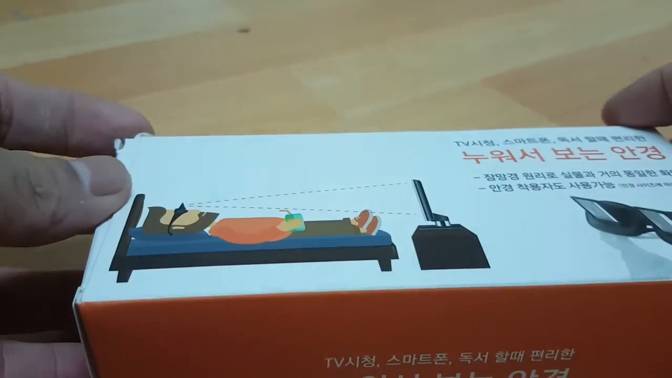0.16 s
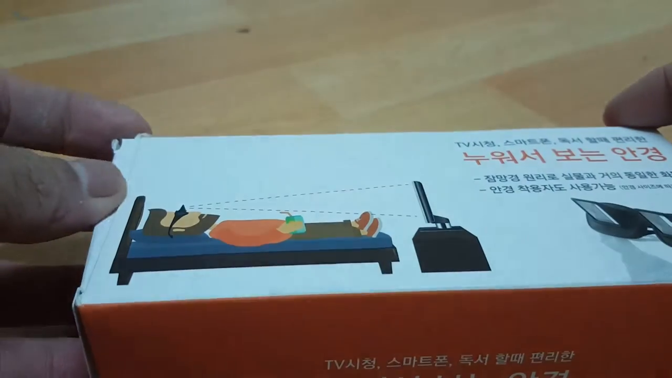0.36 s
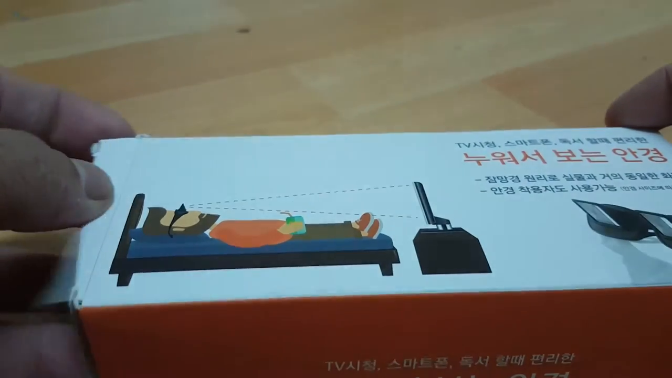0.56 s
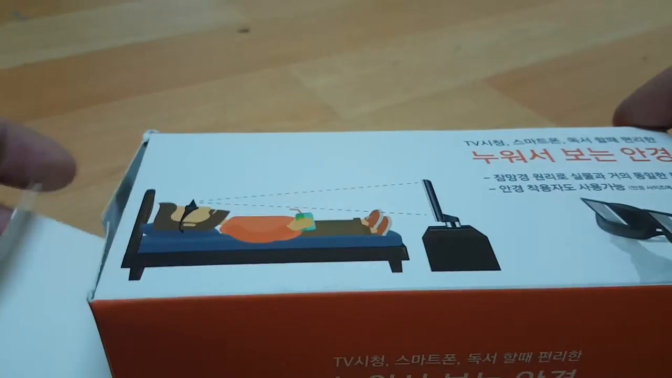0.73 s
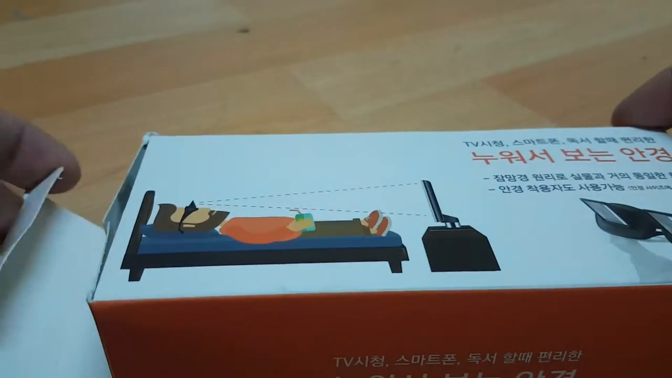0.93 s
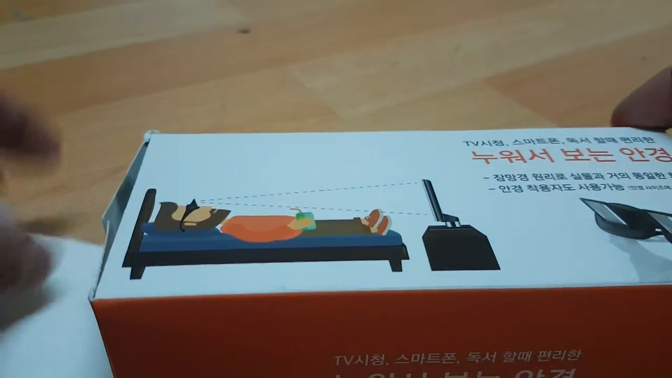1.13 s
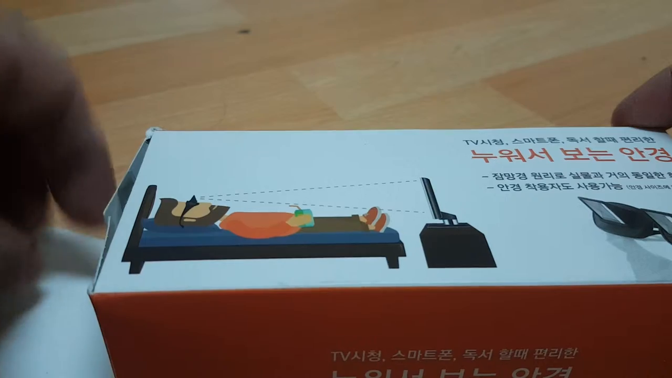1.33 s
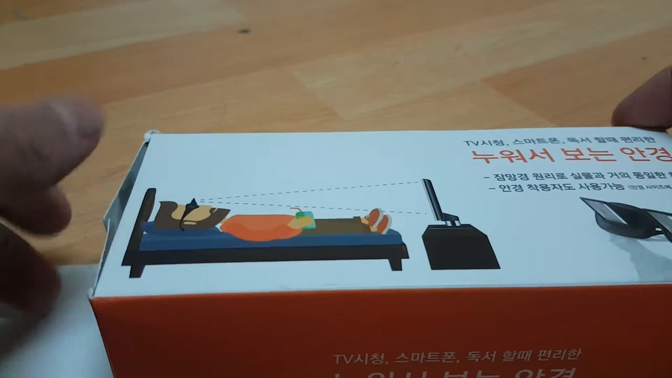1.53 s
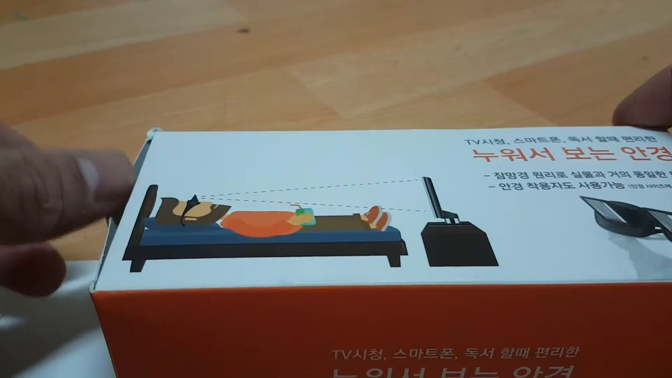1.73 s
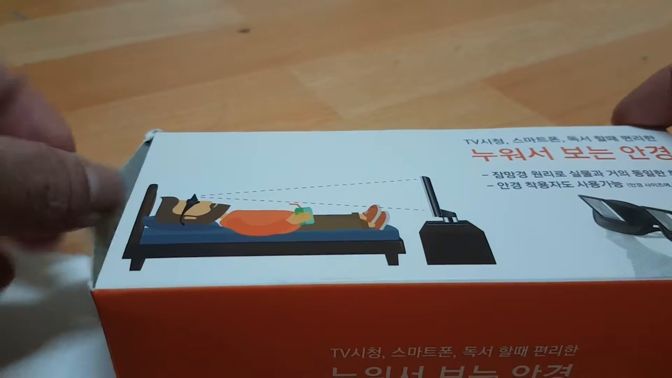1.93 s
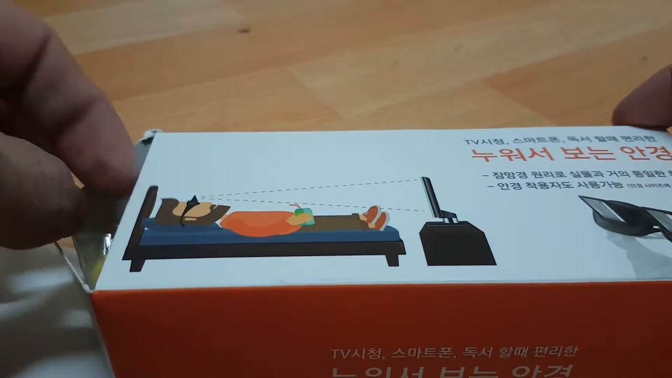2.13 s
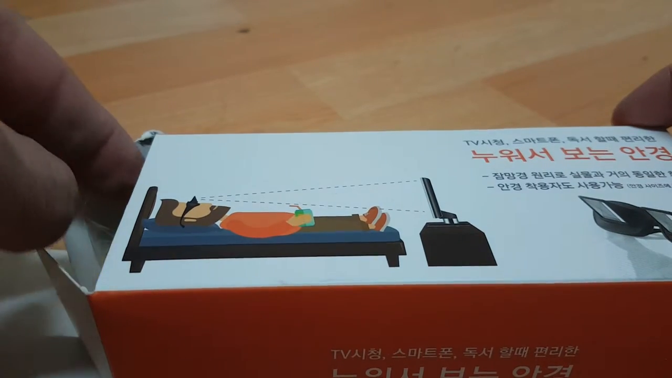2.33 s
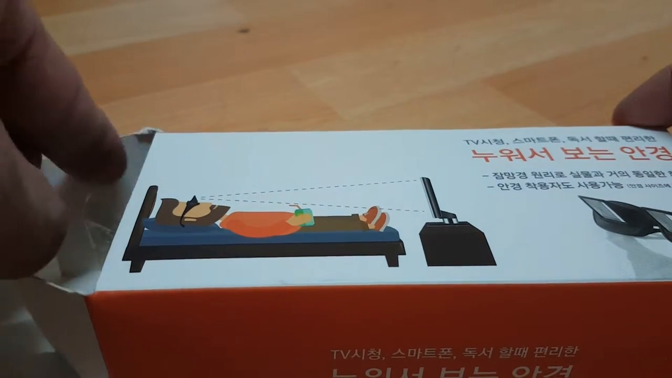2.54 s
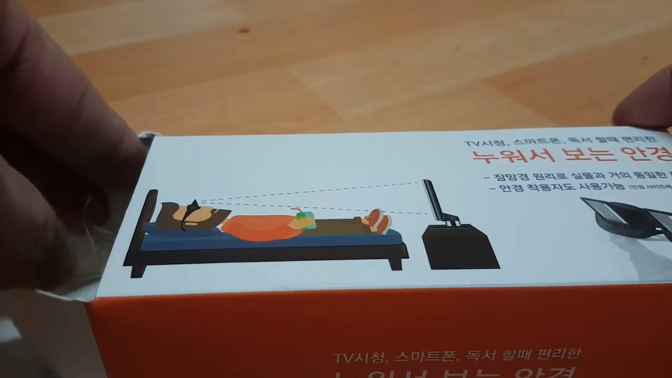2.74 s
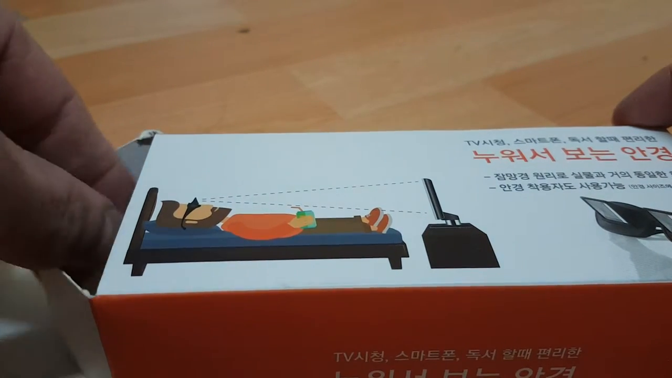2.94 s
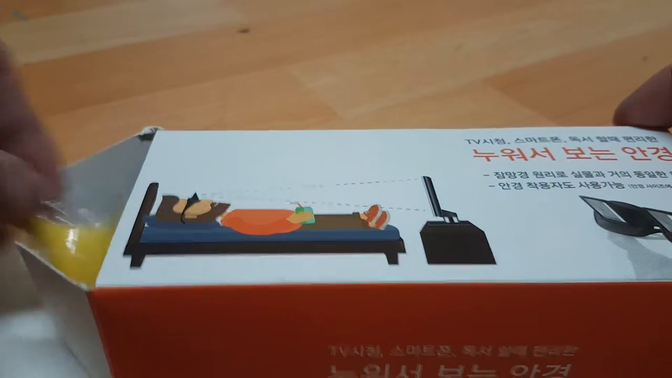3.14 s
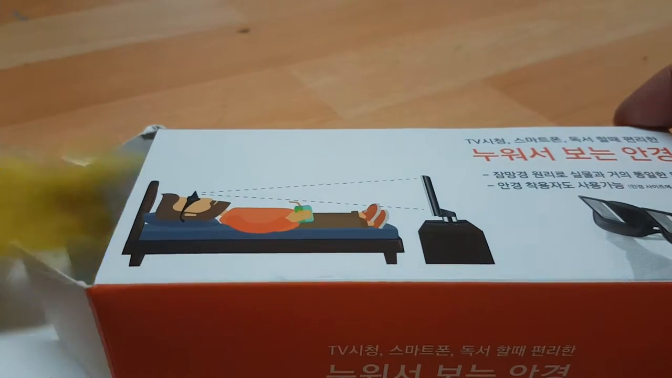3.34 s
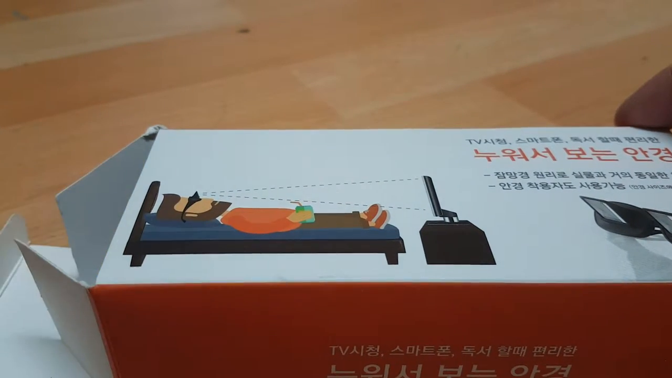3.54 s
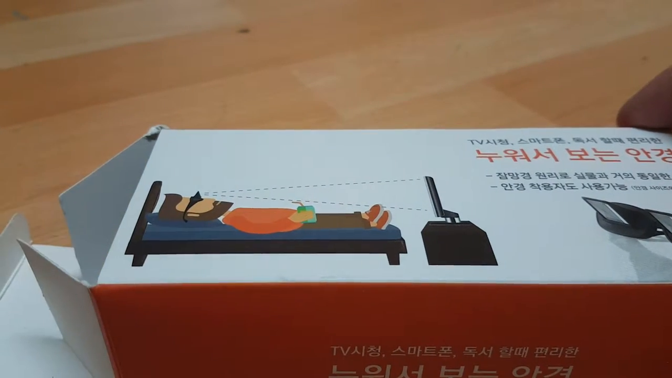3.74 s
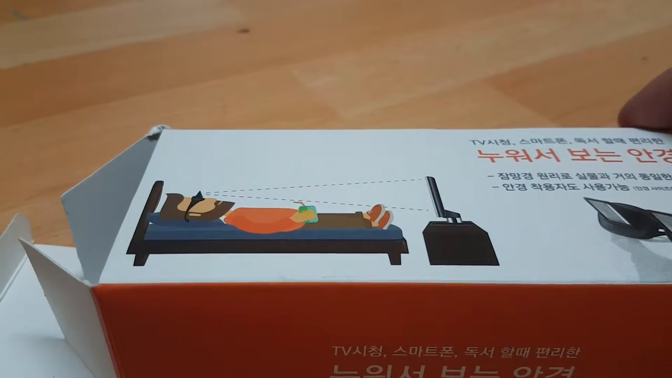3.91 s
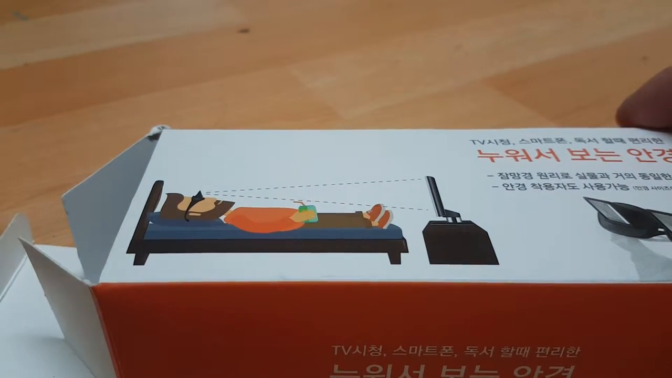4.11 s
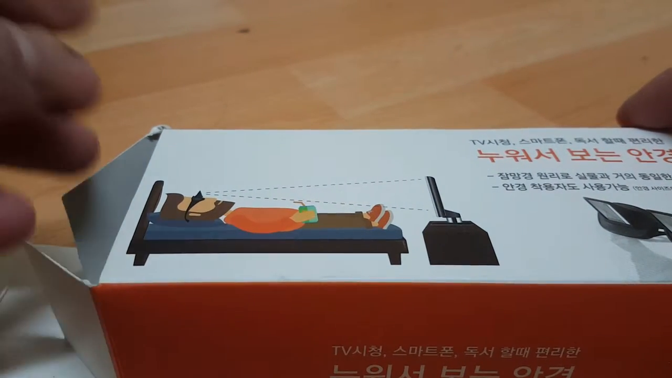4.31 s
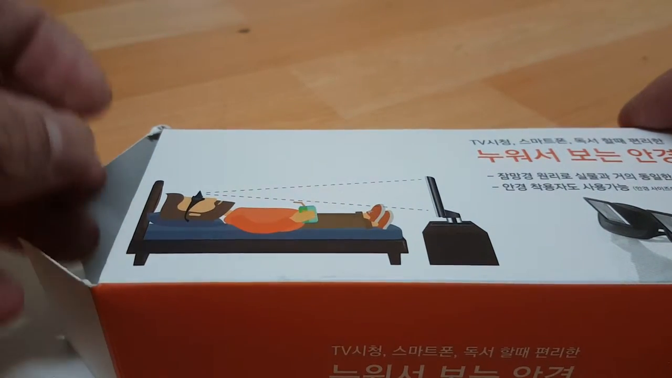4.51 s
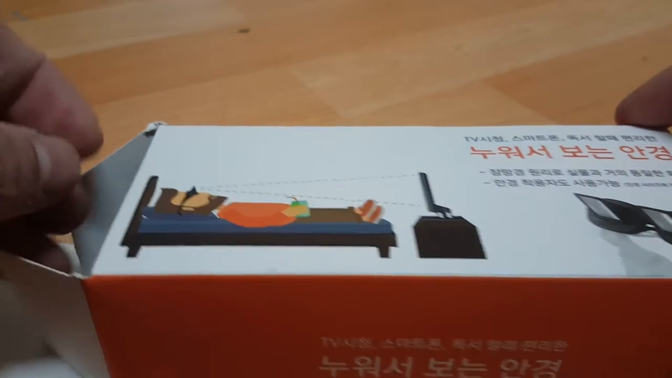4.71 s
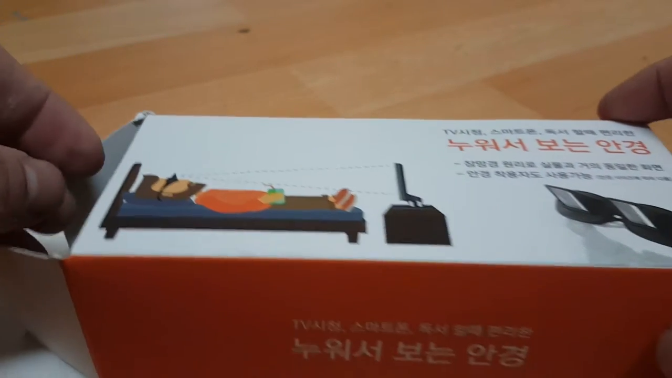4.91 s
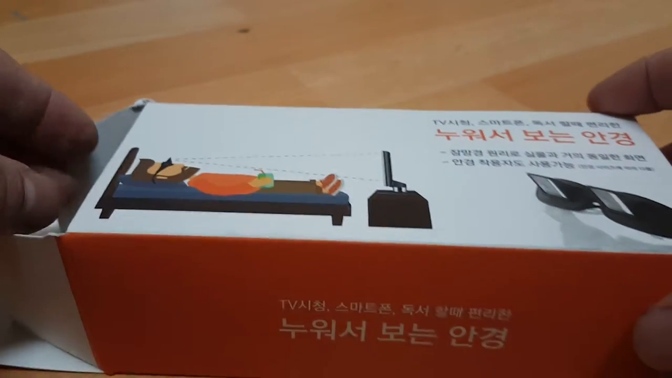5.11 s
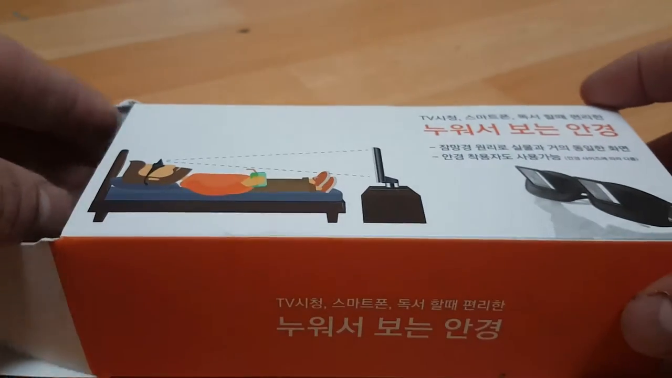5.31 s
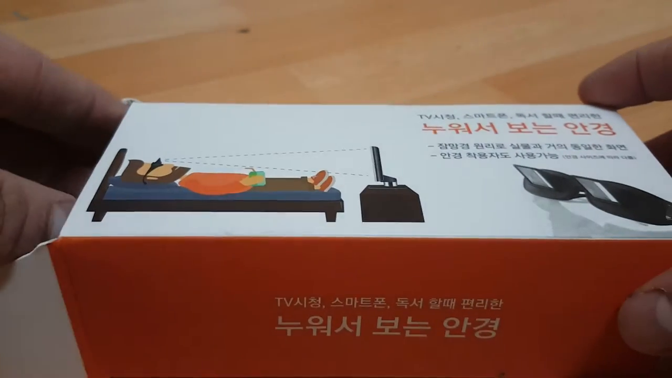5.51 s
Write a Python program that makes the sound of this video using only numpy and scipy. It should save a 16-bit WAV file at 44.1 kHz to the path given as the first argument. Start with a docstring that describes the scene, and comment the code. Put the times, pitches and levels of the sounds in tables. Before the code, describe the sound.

Close cardboard handling: flaps tap and scrape, a thin plastic bag crackles as it is pulled out, then a sharp hollow knock ends it.

```python
"""Rubbing, hollow knocks and plastic crackle: hands open a small cardboard box on a wooden floor,
close to a phone with two microphone ports, while a machine hums in the quiet room.
Rubbing is grit clicks and coloured hiss, knocks are damped sines and noise pushes into box resonances,
the bag is a shower of short noise bursts with single snaps; air and hum are filtered noise."""
import sys
import numpy as np
from scipy import signal
from scipy.fft import rfft, irfft, next_fast_len
from scipy.io import wavfile
from scipy.ndimage import uniform_filter1d

SR = 44100
rng = np.random.default_rng(int(sys.argv[2]) if len(sys.argv) > 2 else 0)


def master(y):
    """Save y as 16-bit WAV."""
    cut = np.clip(np.atleast_2d(y).T, -1, 1)
    pcm = np.round(cut * 32767)  # scale
    wavfile.write(sys.argv[1], SR, pcm.astype(np.int16))


N = 245195

# knocks on the card: (time [s], level [dB], panel pitch [Hz], ring time scale [ms])
KNOCK_EVENTS = [(.042, -52, 417, 5.7), (.153, -41, 342, 2.9), (.651, -26.5, 520, 1.3),
                (.657, -35, 298, 3.5), (.669, -29, 463, 2.6), (.687, -27, 492, 4), (.694, -33.5, 346, 3.4),
                (.842, -43.5, 533, 3.7), (1.426, -45, 503, 7), (1.603, -42, 605, 5.4),
                (1.811, -35, 476, 6.3), (1.842, -40, 647, 5.8), (1.9, -34.5, 947, 2.1),
                (2.017, -30, 624, 4.45), (2.034, -39, 917, 4.5), (2.23, -36, 566, 2.7),
                (2.243, -30.5, 526, 4.4), (2.379, -43, 415, 10), (2.531, -19.5, 634, 6.6),
                (2.655, -21.5, 713, 3.1), (2.712, -34, 874, 6.2), (2.742, -27.5, 432, 8.1),
                (2.85, -24.5, 509, 9.8), (2.931, -26, 385, 1.25), (2.944, -26.5, 435, 5.2),
                (3.191, -24, 910, 2.4), (3.372, -28, 650, 5.5), (3.393, -26, 590, 3.1),
                (3.409, -27.5, 908, 6.2), (3.418, -25.5, 480, 3.6), (4.6, -53.5, 896, 5.7),
                (4.656, -58, 890, 4.7), (5.492, -30.5, 550, 1.15), (5.501, -24, 615, 1.24),
                (5.507, -14.5, 555, 4.24)]
# colour of snapping plastic and card edges: (frequency [Hz], gain [dB])
SNAP_COLOUR = [(900, -33), (1500, -6), (1800, -15.5), (2100, -2.5), (2800, -10.5), (5500, -10.5),
               (8600, -7.5), (10300, -21), (12000, -12.5), (15500, -15)]


def undb(db):
    """Decibels to gain."""
    return 10 ** (np.asarray(db) / 20)


def level(x, db):
    """Set the rms level."""
    return x * undb(db) / np.sqrt(np.mean(x ** 2))


def curve(table):
    """Interpolate the columns of a timed table, one value per sample."""
    s, *columns = np.transpose(table)
    return [np.interp(np.arange(N) / SR, s, c) for c in columns]


def colour(x, points):
    """Shape a spectrum with a causal, minimum-phase response built from the folded cepstrum."""
    hz, db = np.transpose(points)
    f = np.maximum(np.arange(1025) * SR / 2048, 1)
    log_gain = np.interp(np.log(f), np.log(hz), db) * np.log(10) / 20
    cepstrum = irfft(log_gain)
    cepstrum[1:1024] *= 2
    cepstrum[1025:] = 0
    response = irfft(np.exp(rfft(cepstrum)))
    return signal.fftconvolve(x, response)[:len(x)]


def ring(x, hz, width_hz):
    """One resonance, gain 1 at the centre."""
    return signal.lfilter(*signal.iirpeak(hz, hz / width_hz, SR), x)


def walk(rate_hz):
    """Random levels held 1 / rate_hz and slewed twice."""
    k = int(SR / rate_hz)
    steps = np.repeat(rng.standard_normal(N // k + 1), k)
    return uniform_filter1d(uniform_filter1d(steps, k), k)[:N]


def add(track, s, sound):
    """Mix a short sound into a track."""
    i = int(s * SR)
    track[..., i:i + sound.shape[-1]] += sound[..., :N - i]


def room():
    """Steady air, alike at both ports in the bass, with the blurred tones and swelling drone of a machine."""
    # air colour: (frequency [Hz], gain [dB])
    air_colour = [(15, -32.5), (35, -21), (60, -13.5), (142, -14), (214, -4), (313, -12.5), (400, -2),
                  (500, -11), (640, -25), (952, -23.5), (1880, -31), (3320, -33), (4500, -39),
                  (9000, -45.5), (16000, -45.5)]
    # machine tones: (frequency [Hz], level [dB rms], width of each of two filter passes [Hz])
    hum_tones = [(59, -70, 5.1), (122, -68, 10), (172.4, -67.5, 5.5), (375.8, -64.5, 25),
                 (411.7, -65.5, 12), (465, -64, 3.7), (520, -71, 3.1), (2870, -84.5, 28), (3190, -83, 26),
                 (3490, -82.5, 17)]
    # drone swells: (middle [s], Gaussian half width [s], added level [dB])
    drone_swells = [(1.3, .35, -74), (2.25, .3, -57.5), (3.1, 0.26, -62.5), (4.88, 0.19, -71)]
    air_db, drone_hz, drone_width_hz, drone_floor_db = -55.5, 74, 11, -71.5

    mid, side = (colour(rng.standard_normal(N), air_colour) for _ in range(2))
    highpass = signal.butter(2, 800, "high", fs=SR, output="sos")
    side = 0.5 * side + 0.7 * signal.sosfilt(highpass, side)
    air = level(mid + side * np.array([[1], [-1]]), air_db)

    t = np.arange(N) / SR
    drone_gain = undb(drone_floor_db)
    for s, half_s, db in drone_swells:
        drone_gain = drone_gain + undb(db) * np.exp(-.5 * ((t - s) / half_s) ** 2)
    tones = [(hz, undb(db), width_hz) for hz, db, width_hz in hum_tones]
    tones.append((drone_hz, drone_gain, drone_width_hz))
    for hz, gain, width_hz in tones:
        tone = ring(ring(rng.standard_normal(N), hz, width_hz), hz, width_hz)
        air = air + gain * level(tone, 0)
    return air


def reflections(x, t60_s=0.17):
    """Floor and furniture answer with a short, different noise tail at each port."""
    t = np.arange(SR // 3) / SR
    tails = rng.standard_normal((2, len(t))) * 1000 ** (-t / t60_s) * (t > .002)
    tails = tails / np.sqrt(np.sum(tails ** 2) / 2)
    return signal.fftconvolve(x[None], tails, axes=1)[:, :N]


def grit(per_s, spread_db):
    """Fibres that catch and slip: clicks of uneven size and random sign at random moments."""
    size = undb(spread_db * np.minimum(rng.exponential(size=N), 3.5)) * rng.choice([-1, 1], N)
    return size * (rng.random(N) < per_s / SR)


def snap(hz, length_ms, noise):
    """A fold snaps: a wide crack, a short ring and a faint tail; peak 1."""
    age = np.arange(len(noise)) / SR * 1000 / max(length_ms, .2)
    burst = age ** 2 * np.exp(-1.6 * age)
    tail = .02 * np.exp(-age / 9) * (age > 1)
    crack = colour(noise * (burst + tail), SNAP_COLOUR)
    tone = ring(noise * burst, hz, hz / 6)
    sound = crack / np.abs(crack).max() + 1.04 * tone / np.abs(tone).max()
    return sound / np.abs(sound).max()


def ticks():
    """Single snaps and a random shower while the bag is crumpled; each port hears its own mix of folds."""
    # ticks of card edges and plastic folds: (time [s], level before port balance [dB], pitch [Hz])
    tick_events = [(0.156, -38, 2500), (0.6682, -16.5, 4560), (0.6894, -20, 2670), (0.7125, -22.5, 3350),
                   (0.778, -40, 2470), (0.8273, -34.5, 2770), (0.9438, -41, 2060), (1.29, -46, 2490),
                   (1.466, -31.5, 3280), (1.849, -35, 2400), (1.9722, -30, 8100), (2.1083, -41.5, 3050),
                   (2.198, -36.5, 2150), (2.2495, -37, 3100), (2.531, -24.5, 8700), (2.6581, -19.5, 3740),
                   (2.881, -33.5, 2260), (2.9284, -34, 8600), (3.0217, -25, 8400), (3.057, -25.5, 8600),
                   (3.08, -26.5, 8550), (3.098, -26, 2130), (3.3326, -18.5, 2150), (3.3566, -22, 2260),
                   (3.473, -23.5, 2240), (3.5125, -22, 2130), (3.563, -29.5, 2360), (3.6067, -35, 2880),
                   (3.726, -30, 5070), (3.7432, -24.5, 8100), (3.7693, -23, 2010), (3.851, -36.5, 2290),
                   (3.8842, -36, 8050), (3.897, -42.5, 2250), (3.914, -39.5, 2560), (3.9828, -37.5, 2070),
                   (4.115, -43, 1970), (4.122, -48, 2190), (4.158, -39.5, 2110), (4.1784, -35.5, 7450),
                   (4.219, -51, 2300), (4.2448, -25.5, 7450), (4.5755, -32, 8300), (4.916, -39, 2220),
                   (5.5017, -23.5, 7540), (5.5083, -15.5, 3000)]
    # how hard the bag is crumpled, pulled out and set down: (time [s], relative level [dB])
    crumple_force = [(2.91, -66), (2.93, -35.5), (3.0, -48), (3.2, -41.5), (3.41, -36), (3.5, -48.5),
                     (3.62, -71), (3.7, -58.5), (3.77, -40.5), (3.83, -61)]
    brisk_per_s, brisk_db, density_law = 340, -39, 0.5  # density_law: dB of rate per dB of level
    port_balance_db = [[2.1], [-2.1]]

    snaps = np.zeros((2, N))
    noises = rng.standard_normal((len(tick_events), 2, 2048))
    lengths_ms = rng.uniform(0.72, 1.53, len(tick_events))
    for (s, db, hz), noise, ms in zip(tick_events, noises, lengths_ms):
        pair = np.array([snap(hz, ms, noise[0]), snap(hz, ms, noise[0] + noise[1])])
        add(snaps, s - .001, undb(db) * pair)

    db, = curve(crumple_force)
    per_s = brisk_per_s * undb(density_law * (db - brisk_db))
    t = np.arange(N) / SR
    moving = (t > crumple_force[0][0]) & (t < crumple_force[-1][0])
    age_s = t[:500]
    burst = age_s / 0.00083 * np.exp(1 - age_s / 0.00052) + 0.084 * np.exp(-age_s / 0.0072)
    clicks = np.abs(grit(per_s * moving, 4.6)) * undb(db)
    shower = signal.fftconvolve(clicks, burst)[:N]
    shared, own = (level(colour(rng.standard_normal(N), SNAP_COLOUR), 0) for _ in range(2))
    crackle = np.array([shared, .6 * shared + .8 * own]) * shower
    return (snaps + crackle) * undb(port_balance_db)


def box(push, grip_db=0):
    """The hollow box rings at its steep-sided resonances; a shifting grip frees and damps them in turn."""
    # box resonances: (frequency [Hz], width of each of two filter passes [Hz], gain [dB])
    box_modes = [(175.4, 80, -3), (291.4, 100, 1.5), (397.4, 30, 2.5), (557, 192, 6), (630, 190, -26),
                 (862, 222, 2), (1181, 74, 1), (1353, 280, -0.5), (1538, 200, -2)]
    total = 0
    for hz, width_hz, db in box_modes:
        mode = ring(ring(push, hz, width_hz), hz, width_hz)
        total = total + undb(db + grip_db * walk(9)) * mode
    return total


def rubbing():
    """Slipping fibres shake the box and hiss; strokes start abruptly and die fast; knocks rustle the flaps."""
    # strokes of skin, flaps and bag, levels at mid-stroke before pressure wander:
    # (start [s], end [s], box level [dB], hiss level [dB], swell from start to end [dB])
    strokes = [(.424, 0.514, -53.5, -67.5, 20), (0.518, 0.657, -45.5, -47, 3),
               (0.653, 0.709, -39, -34.5, -17), (0.733, 0.784, -65, -55, -1),
               (0.792, 0.842, -56.5, -46.5, 7.5), (1.13, 1.2, -67.5, -60, 3),
               (1.38, 1.436, -59.5, -53, 17.5), (1.451, 1.51, -57.5, -45, -17),
               (1.896, 2.044, -61.5, -75, 27), (2.051, 2.141, -53.5, -59.5, 0),
               (2.155, 2.255, -51.5, -54.5, -8.5), (2.243, 2.375, -53, -50, -22),
               (2.374, 2.414, -42.5, -46.5, -6), (2.43, 2.533, -61, -64, 33),
               (2.542, 2.665, -47, -48, -13.5), (2.691, 2.788, -42, -53, -12.5),
               (2.84, 2.912, -44.5, -61, -21), (2.966, 3.07, -53.5, -44.5, -8),
               (3.056, 3.203, -45.5, -60, -1), (3.185, 3.362, -39.5, -36.5, 5.5),
               (3.376, 3.43, -30.5, -25.5, 1.5), (3.708, 3.81, -62, -52.5, -6),
               (4.567, 4.66, -68, -60, -15), (4.728, 4.871, -47.5, -49.5, -2.5), (4.89, 5.01, -60, -57, 8),
               (5.001, 5.159, -45.5, -53.5, 3), (5.206, 5.335, -47.5, -73, 11),
               (5.31, 5.503, -39.5, -53, 8.5)]
    # colour of rubbed card: (frequency [Hz], gain [dB])
    card_colour = [(880, -21), (1500, -11), (1870, -4), (2220, -1.5), (5810, -12.5), (8600, -8.5),
                   (10100, -21.5), (12000, -21), (15500, -25), (16500, -51)]
    attack_s, release_s = .0054, 0.011
    treble_base_db, treble_per_hollow = 1.5, 0.49  # dB of treble per dB of box over hiss
    rustle_db, rustle_treble_db = -10.5, -5.5  # under the knock; treble under the rustle
    rustle_attack_s, rustle_decay_s = 0.0016, .014

    t = np.arange(N) / SR
    levels = np.zeros((3, N))
    for start, end, box_db, hiss_db, swell_db in strokes:
        along = np.clip((t - start) / (end - start), 0, 1)
        attack = np.minimum(along * (end - start) / attack_s, 1)
        release = np.exp(-np.maximum(t - end, 0) / release_s)
        stroke = attack * release * undb(swell_db * (along - .5))
        treble_db = treble_base_db + treble_per_hollow * (box_db - hiss_db)
        gains = undb([[box_db], [hiss_db], [hiss_db + treble_db]])
        levels = np.hypot(levels, gains * stroke)
    for s, db, *_ in KNOCK_EVENTS:
        rise = np.clip((t - s) / rustle_attack_s, 0, 1)
        rustle = rise * np.exp(-np.abs(t - s) / rustle_decay_s)
        gains = undb([[db + rustle_db], [db + rustle_db + rustle_treble_db]])
        levels[1:] = np.hypot(levels[1:], gains * rustle)
    on_box, on_skin, on_tips = levels

    pressure = undb(3.1 * walk(45))
    # slips are short pushes, so they favour the upper resonances
    slips = level(signal.lfilter([1, -.93], 1, grit(2000, 2.7)), 0)
    hollow = box(slips * on_box * pressure, 3.94) / np.std(box(slips))

    # each band of the hiss brightens and dulls on its own
    hiss = 0
    fibres = np.array([level(colour(grit(6000, 3.9), card_colour), 0) for _ in range(2)])
    edges_hz = np.geomspace(900, 17500, 14)
    for low_hz, high_hz in zip(edges_hz, edges_hz[1:]):
        bandpass = signal.butter(2, [low_hz, high_hz], "band", fs=SR, output="sos")
        weight = on_skin if low_hz < 5500 else on_tips
        hiss = hiss + signal.sosfilt(bandpass, fibres) * undb(2.5 * walk(11)) * weight
    return hollow, hiss * pressure


def swing(t, hz, ring_ms):
    """A panel swells and rings down as a sine under a damped envelope; envelope peak 1."""
    age = t * 1000 / max(ring_ms, .5)
    shape = age ** 0.87 * np.exp(-.5 * age ** 1.77)
    return shape / shape.max() * np.sin(2 * np.pi * hz * t)


def knocks():
    """The touched panel rings at its own pitch and the whole box shakes; heavier moves bump the floor."""
    # box bumping the floor boards: (time [s], level [dB], pitch [Hz])
    floor_bumps = [(.151, -47, 274), (.655, -36, 248), (0.682, -30.5, 159), (1.425, -40, 257),
                   (2.244, -41, 181), (2.533, -26.5, 295), (2.936, -38.5, 103), (3.391, -47, 105.5),
                   (5.51, -33.5, 240)]
    shake_db, shake_law, usual_ring_ms = 1.5, -0.45, 4.04  # short dry knocks shake the box more
    bump_cycles = 0.92  # envelope time scale

    panel, push = np.zeros(N), np.zeros(N)
    t = np.arange(SR // 8) / SR
    shove = t / 0.0016 * np.exp(-t / 0.002)
    noises = rng.standard_normal((len(KNOCK_EVENTS), len(t)))
    for (s, db, hz, ring_ms), noise in zip(KNOCK_EVENTS, noises):
        add(panel, s - 0.25 * ring_ms / 1000, undb(db) * swing(t, hz, ring_ms))
        shake = undb(db + shake_db) * (ring_ms / usual_ring_ms) ** shake_law
        add(push, s - .001, shake * noise * shove)
    for s, db, hz in floor_bumps:
        add(panel, s, undb(db) * swing(t, hz, bump_cycles / hz * 1000))
    return panel + 7.1 * box(push)


def ports(both):
    """High sound reaches the right port later; in the bass the phone hears as one body."""
    lag_s, one_body_hz = .00027, 1100
    size = next_fast_len(N + 64)
    f = np.arange(size // 2 + 1) * SR / size
    share = 1 / (1 + (one_body_hz / (f + 1)) ** 8)
    delay = np.exp(-2j * np.pi * f * lag_s * share)
    right = irfft(rfft(both[1], size) * delay, size)[:N]
    return np.array([both[0], right])


def scene():
    """Box and bag, louder at the left port, with reflections and hiss over the room."""
    hollow, hiss = rubbing()
    card = (hollow + knocks()) * undb([[.6], [-.6]])
    near = card + ticks()
    echoes = undb(-10) * reflections(near.mean(axis=0))
    return ports(near) + echoes + hiss * undb([[1.8], [-1.8]]) + room()


def record(dry):
    """Limit the bandwidth: soften the treble above 15.9 kHz and end it near 16.9 kHz with two elliptic low-passes."""
    soften_hz, top_hz = 15900, 16900
    soft = signal.sosfilt(signal.ellip(7, .5, 26, soften_hz, fs=SR, output="sos"), dry)
    return signal.sosfilt(signal.ellip(10, .2, 70, top_hz, fs=SR, output="sos"), soft)


dry = scene()
out = record(dry)
master(out)
```